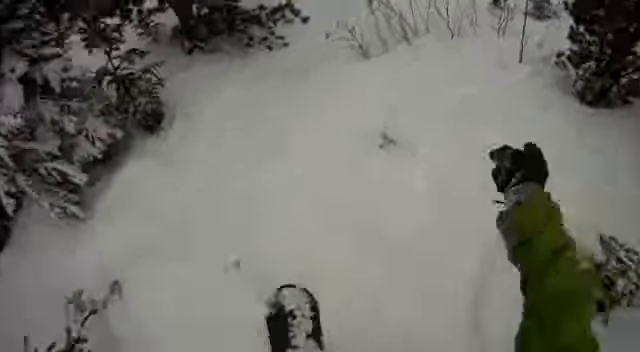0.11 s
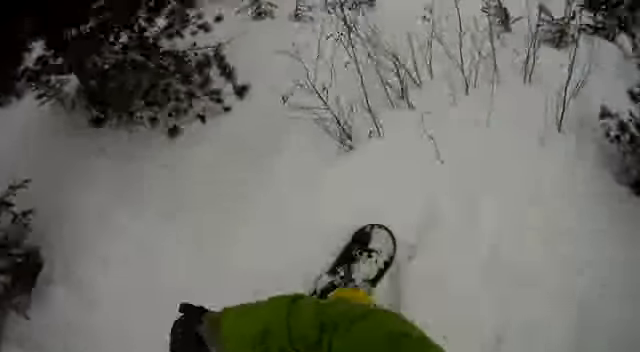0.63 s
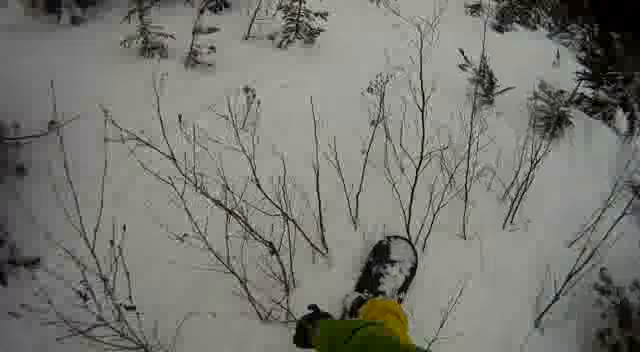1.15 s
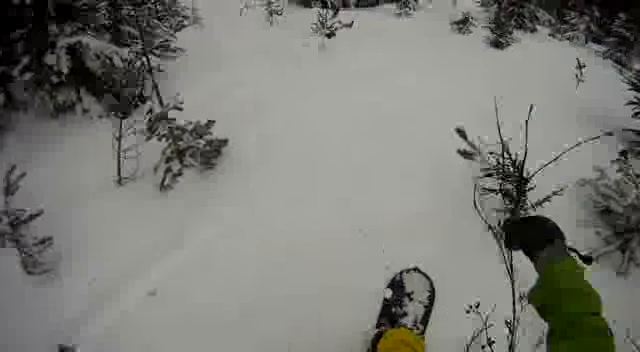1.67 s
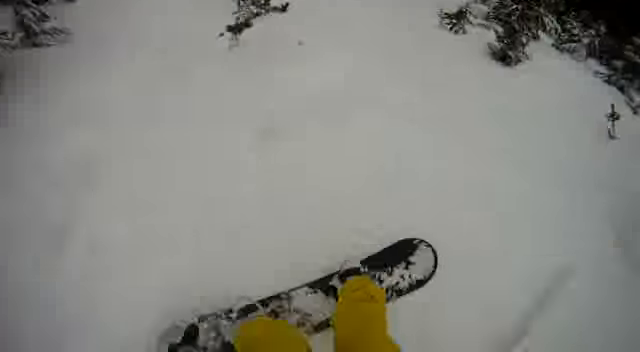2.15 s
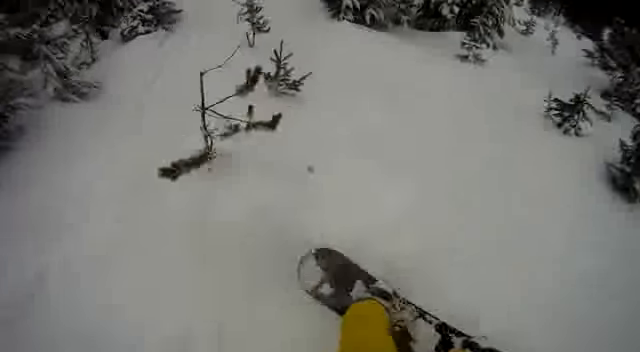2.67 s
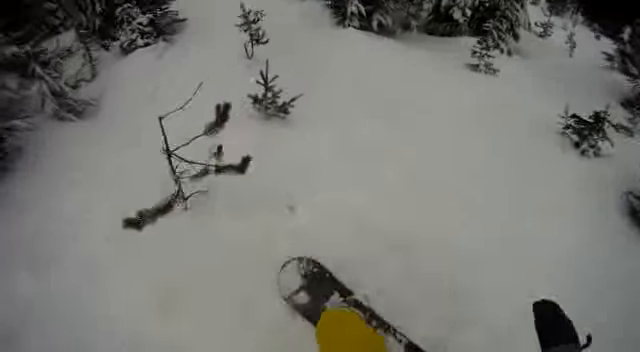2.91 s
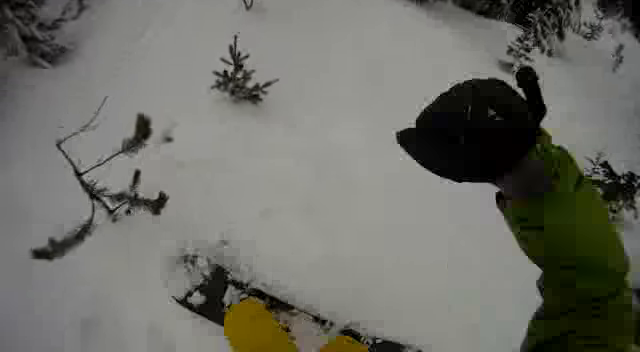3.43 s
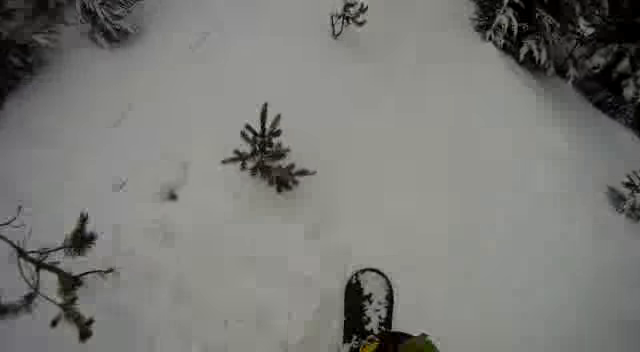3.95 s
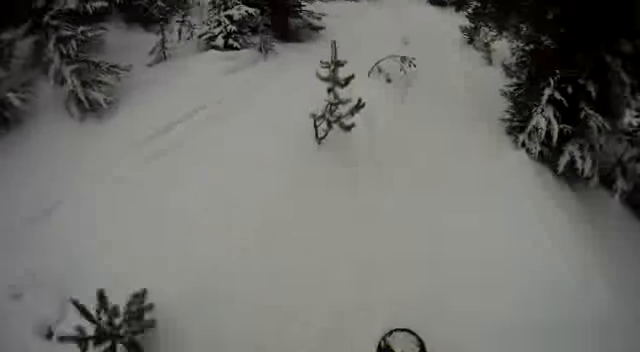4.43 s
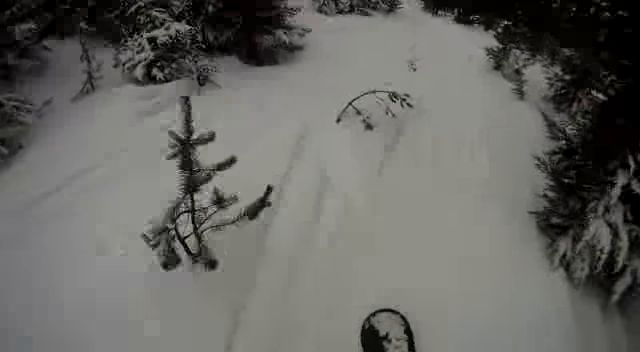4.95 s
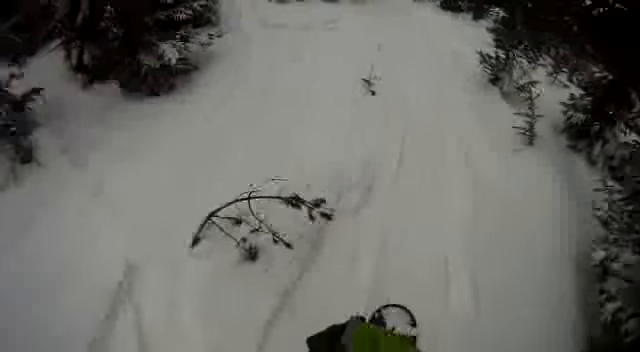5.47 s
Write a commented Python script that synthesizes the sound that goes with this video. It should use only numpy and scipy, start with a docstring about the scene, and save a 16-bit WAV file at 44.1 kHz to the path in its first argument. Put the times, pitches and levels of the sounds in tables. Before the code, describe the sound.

Close, muffled and gritty helmet-camera sound outdoors on a snowy slope. Grainy snow hiss flickers under light wind rumble while branches tick and scrape against the plastic case. Heavy low thumps strike just before and after two seconds, with a brief snow surge. After a quiet pause, a sharp knock and low thud return, followed by a lesser bump and mostly steady, soft sliding.

```python
"""A low wind rumble and a faint hiss come first, then thumps, twig ticks and rushes of snow.
A snowboard runs through deep powder and thin brush, heard by a small camera cased in plastic on a helmet.
Jolts push the sprung mount, which rings low; strikes ring the modes of the case.
Snow is dense grains in flickering noise; wind and jolts shake the mount as low noise.
The camera samples slowly and holds each sample, so the sound is mirrored into the treble."""
import sys
import numpy as np
from scipy import signal
from scipy.fft import rfft, irfft
from scipy.io import wavfile
from scipy.ndimage import uniform_filter1d

SR = 44100
rng = np.random.default_rng(int(sys.argv[2]) if len(sys.argv) > 2 else 0)


def unload_wav(signal):
    """Save mono or channel-first audio to the path in sys.argv[1] as 16-bit WAV at rate SR, clipped to [-1, 1]."""
    wavfile.write(
        sys.argv[1],
        SR,
        np.round(np.clip(np.atleast_2d(signal).T, -1, 1) * 32767).astype(np.int16),
    )


def convert_level_to_amplitude(level_db):
    """Map a level in decibels to its linear amplitude factor."""
    exponent = np.asarray(level_db, float) / 20
    return 10 ** exponent


N = 246078  # length [samples]

# Tone of the preamp hiss: (frequency [Hz], relative density [dB per Hz])
HISS_TONE = [(88, -22), (150, -2), (222, -4), (315, -6.5), (350, -7.5), (519, -13.5), (569, -10),
             (5600, -22.5), (7280, -56), (12300, -120)]
# Tone of the shaken mount: (frequency [Hz], relative density [dB per Hz])
SHAKE_TONE = [(12, -22), (20, -9.5), (43, -2), (75, -4), (93, -13), (114, -16.5), (236, -35), (400, -42),
              (520, -64), (880, -120)]
# Tone of the crushed snow: (frequency [Hz], relative density [dB per Hz])
SNOW_TONE = [(180, -55), (300, -15.5), (625, -9), (789, -17), (881, -10.5), (1490, -5), (2050, -2.5),
             (2470, -9), (2720, -9), (3310, -18), (5600, -28.5), (7280, -55), (12300, -120)]
# Tone of the noise that sets left against right: (frequency [Hz], relative density [dB per Hz])
SIDE_TONE = [(24, -26), (40, -12), (158, -18), (1270, -16.5), (1610, -22), (1820, -16.5), (5000, -23.5),
             (6500, -55), (11000, -120)]
# The slide over time: (time [s], snow hiss level [dB], wind shake level [dB])
RIDE = [(0.0, -68, -63), (0.36, -61, -52.5), (0.56, -63.5, -58.5), (0.81, -58.5, -57), (1.1, -63, -57),
        (1.38, -61.5, -54), (1.68, -58, -62), (1.79, -58.5, -45), (1.88, -48, -31), (1.99, -61, -43),
        (2.16, -53.5, -44), (2.36, -59, -42.5), (2.5, -62.5, -55), (2.8, -64.5, -58.5), (3.11, -71, -63.5),
        (3.33, -59.5, -56.5), (3.48, -56, -49.5), (3.68, -59, -54), (3.79, -55, -49), (3.9, -60.5, -56),
        (4.11, -60.5, -55.5), (4.29, -70, -53.5), (4.65, -65, -57.5), (5.17, -59, -53.5), (5.58, -61, -57)]
# Crisp spray over time: (time [s], level against the snow hiss [dB])
SPRAY = [(0, -11), (.4, -9), (1.1, -11.5), (1.45, -7), (2.1, -13.5), (2.5, -8), (3.1, -7), (3.35, -14),
         (3.95, -11.5), (4.9, -12), (5.58, -22)]
# Modes of the plastic case: (frequency [Hz], strength [dB], decay by 60 dB [s])
CASE_MODES = [(340, 10.5, 0.016), (677, -3, 0.049), (853, -8.5, 0.031), (1353, -3, 0.028),
              (1607, -6.5, 0.022), (2170, 0.5, 0.013), (2720, 5, 0.0038), (3690, 4, 0.0062),
              (4260, -23, 0.0072), (5300, 6, 0.0092)]
# Twig and branch strikes and scrapes:
# (time [s], peak level [dB], brightest pitch [Hz], reach [octaves], rattle [ms])
STRIKES = [(0.685, -48, 1930, 0.98, 2), (0.732, -57, 2000, 1.5, 3), (.79, -51.5, 1820, 0.75, 30),
           (0.823, -43.5, 2200, 1.1, 7.4), (1.036, -48, 2170, 0.45, 3.7), (1.057, -53, 2200, 0.55, 2.8),
           (1.086, -42, 2570, 0.92, 3.4), (1.247, -46, 1500, 1.7, 6.2), (1.315, -46, 930, 1.63, 4.8),
           (1.402, -47.5, 905, 1.4, 4.6), (1.487, -46.5, 1870, 0.95, 5), (1.55, -53.5, 2130, 0.52, 54),
           (1.69, -37, 2560, 0.61, 2.3), (1.825, -46, 3480, 0.92, 9.8), (1.844, -45, 3500, 1.25, 8.8),
           (1.857, -43.5, 2000, 0.78, 8.7), (1.886, -43.5, 4040, 0.56, 32), (1.9148, -19, 1326, 0.71, 1.8),
           (1.924, -40, 2920, 0.8, 2.6), (2.137, -47, 1840, 0.87, 21), (2.1884, -15, 1315, 0.75, 2.45),
           (2.193, -39.5, 2940, 0.35, 5), (2.285, -54, 2530, 0.71, 80), (2.38, -46.5, 3800, 1.3, 8.6),
           (2.414, -49.5, 1500, 1.37, 4.3), (2.452, -51.5, 2500, 0.88, 3.3), (2.684, -50.5, 2000, 2.8, 2.1),
           (3.518, -43.5, 3100, 0.93, 22), (3.544, -44, 3820, 0.86, 16), (3.559, -32.5, 985, 1.2, 7.3),
           (3.565, -40.5, 1600, 1.8, 6.2), (3.578, -52.5, 4400, 0.84, 39), (3.612, -41.5, 2420, 0.43, 21),
           (3.639, -47, 2310, 0.3, 1.8), (3.731, -46.5, 2100, 0.46, 24), (3.757, -46, 2020, 0.54, 30),
           (3.89, -45, 3060, 1.1, 7.3), (3.914, -41.5, 2780, 0.78, 10), (5.473, -46.5, 2260, 0.66, 5.1)]
# Jolts that push the case: (time [s], push [dB], length [ms])
JOLTS = [(0.143, -30.5, 13.8), (.308, -46.5, 15), (.775, -24.5, 6.6), (0.9036, -20.5, 12),
         (0.9996, -33.5, 14), (1.56, -41, 11.4), (1.606, -36, 17), (1.645, -42, 14.7), (1.791, -25, 12.5),
         (1.859, -25, 5), (1.875, -21.5, 15), (1.899, -27, 15.6), (1.9149, -15.5, 3.7), (1.9173, -3, 17.6),
         (2.009, -34, 7.3), (2.094, -28, 20.7), (2.15, -31, 14), (2.173, -25, 7.3), (2.1885, -2.5, 23.4),
         (2.1893, -9.5, 4.5), (2.414, -11, 11.4), (2.78, -37.5, 20), (2.871, -38, 15), (3.289, -31.5, 23.5),
         (3.5097, -21, 4.7), (3.538, -22.5, 18.3), (3.561, -5, 16.3), (3.721, -37.5, 7.3),
         (3.776, -34.5, 15), (3.866, -15, 22), (3.894, -27.5, 6.8), (4.188, -42, 13.6), (4.2325, -25, 16.1),
         (4.507, -45, 13.3), (4.951, -36.5, 18.4), (5.272, -31.5, 14.6)]


def level(x, db):
    """Set the rms level of x in dB."""
    return x * convert_level_to_amplitude(db) / np.sqrt(np.mean(x ** 2))


def colour(x, points):
    """Weight the spectrum by (frequency [Hz], gain [dB]) points."""
    hz, db = np.transpose(points)
    f = np.maximum(np.arange(N // 2 + 1) * SR / N, 1)
    gain = convert_level_to_amplitude(np.interp(np.log(f), np.log(hz), db))
    return irfft(rfft(x) * gain, N)


def walk(rate):
    """Random values held for 1 / rate seconds and smoothed twice; spread about 0.5."""
    k = int(SR / rate)
    steps = np.repeat(rng.standard_normal(N // k + 1), k)
    return 0.65 * uniform_filter1d(uniform_filter1d(steps, k), k)[:N]


def add(out, s, x):
    """Mix x into out from s seconds on."""
    i = int(s * SR)
    out[i:i + len(x)] += x[:N - i]


def preamp_hiss():
    """Steady coloured noise from the preamp."""
    return level(colour(rng.standard_normal(N), HISS_TONE), -65)


def mount_shake(wind_db):
    """Wind rocks the mount as low noise, and every jolt leaves a fading shudder of the helmet."""
    SHUDDER_DB, SHUDDER_S = -30.5, 0.053  # start against the push [dB], time constant [s]
    fade = np.exp(-np.arange(SR // 2) / SR / SHUDDER_S)
    shudder = np.zeros(N)
    for s, db, _ in JOLTS:
        add(shudder, s, convert_level_to_amplitude(db + SHUDDER_DB) * fade)
    rumble = level(colour(rng.standard_normal(N), SHAKE_TONE), 0)
    return rumble * np.hypot(convert_level_to_amplitude(wind_db), shudder) * convert_level_to_amplitude(2.3 * walk(7.3))


def snow_grains():
    """Sparse single-sample clicks of uneven size and random sign: crystals crushed under the base."""
    GRAINS_PER_S = 1500
    happens, sign, size = rng.random((3, N))
    size_db = np.minimum(-2.5 * np.log(1 - size), 9.5)  # a few are much larger
    return (happens < GRAINS_PER_S / SR) * np.sign(sign - 0.5) * convert_level_to_amplitude(size_db)


def snow(spray_db):
    """Grains in a hiss whose low and high halves flicker apart, with fine bright spray on top."""
    SPLIT_HZ, SPRAY_HZ = 1900, (2900, 5850)
    crush = level(snow_grains(), -0.8) + rng.standard_normal(N)
    hiss = level(colour(crush, SNOW_TONE), 0)
    low = signal.sosfiltfilt(signal.butter(2, SPLIT_HZ, fs=SR, output="sos"), hiss)
    high = hiss - low
    spray_band = signal.butter(2, SPRAY_HZ, "band", fs=SR, output="sos")
    spray = level(signal.sosfilt(spray_band, rng.standard_normal(N)), 0)
    flickering = low * convert_level_to_amplitude(4.4 * walk(37)) + high * convert_level_to_amplitude(7.6 * walk(40))
    return flickering + spray * convert_level_to_amplitude(spray_db + 4.5 * walk(48))


def faint_ticks():
    """Small twigs and crusts at random moments, as rows like those of STRIKES."""
    rows = []
    for when, softer, pitch, length in rng.random((30, 4)):
        peak_db = -54.5 - 8.0 * softer
        hz = 2100 * 2 ** (pitch - 0.5)
        rattle_ms = 4.2 * 2 ** (3.3 * length - 1)
        rows.append((when * N / SR, peak_db, hz, 1.2, rattle_ms))
    return rows


def case_ring(t, hz, reach, chance):
    """Decaying case modes, strongest near hz, each a little off in strength and pitch."""
    ring = np.zeros(len(t))
    for (f, db, t60), (louder, sharper) in zip(CASE_MODES, chance):
        away = np.log2(f / hz) / reach
        strength = convert_level_to_amplitude(db + 1.4 * louder - 8.1 * away ** 2)
        ring += strength * np.sin(2 * np.pi * f * (1 + 0.038 * sharper) * t) * 1000 ** (-t / t60)
    return ring


def strikes():
    """A rattle of contact rings the case near its brightest pitch; soft contact leaves out the top."""
    FIRST_TOUCH, DRY_CRACK = 7.4, 4.34  # against the rattle's rms, against the ring's peak
    DRAG_DB, DRAG_S = -32, 0.012  # the branch drags on after its blow
    out, t = np.zeros(N), np.arange(SR // 12) / SR
    rows = STRIKES + faint_ticks()
    rattles = rng.standard_normal((len(rows), len(t)))
    chances = rng.standard_normal((len(rows), len(CASE_MODES), 2))
    for (s, db, hz, reach, ms), rattle, chance in zip(rows, rattles, chances):
        blow = np.exp(-(t / (ms / 1000)) ** 2)
        drag = convert_level_to_amplitude(DRAG_DB) * np.exp(-t / DRAG_S)
        contact = rattle * (blow + drag)
        contact[0] = -FIRST_TOUCH  # the first touch is the hardest
        ring = case_ring(t, hz, reach, chance)
        ring[0] = DRY_CRACK * np.max(ring)  # part of the contact reaches the microphone unrung
        band = [hz * 2 ** (-1.6 * reach), min(hz * 2 ** (1.03 * reach), SR / 4)]
        softness = signal.butter(4, band, "band", fs=SR, output="sos")
        hit = signal.sosfilt(softness, signal.fftconvolve(contact, ring))
        peak = np.sqrt(np.max(uniform_filter1d(hit ** 2, SR // 500)))  # loudest 2 ms
        add(out, s, convert_level_to_amplitude(db) * hit / peak)
    return out


def push_shape(db, ms):
    """1 swells and eases evenly, lower starts suddenly; hard or brief pushes are more sudden."""
    HARD, GENTLE = 0.51, 0.9
    by_force = np.interp(db, [-20.5, 0], [GENTLE, HARD])
    by_length = np.interp(ms, [3.7, 13.2], [HARD, GENTLE])
    return min(by_force, by_length)


def jolts():
    """Each push swells and eases off; the sprung mount lets it through, rebounds and rings."""
    PADDING_HZ, MOUNT_HZ, MOUNT_T60_S, SAG_HZ = 437, 78.1, 0.13, 5.4
    push = np.zeros(N)
    for s, db, ms in JOLTS:
        u = np.linspace(0, 1, int(ms * SR / 1000))
        add(push, s, -convert_level_to_amplitude(db) * np.sin(np.pi * u ** push_shape(db, ms)) ** 2)
    # helmet padding rounds the edges
    push = signal.sosfilt(signal.butter(2, PADDING_HZ, fs=SR, output="sos"), push)
    w, fade = 2 * np.pi * MOUNT_HZ, np.log(1000) / MOUNT_T60_S
    spring = signal.bilinear([1, 0, 0], [1, 2 * fade, w ** 2], SR)
    rung = signal.lfilter(*spring, push)
    return signal.sosfilt(signal.butter(1, SAG_HZ, "high", fs=SR, output="sos"), rung)


def scene():
    """Mix the thumps, strikes, slide, shake and hiss alike into both channels."""
    t = np.arange(N) / SR
    s, *columns = np.transpose(RIDE)
    snow_db, wind_db = (np.interp(t, s, c) for c in columns)
    spray_db = np.interp(t, *np.transpose(SPRAY))
    slide = snow(spray_db) * convert_level_to_amplitude(snow_db)
    mix = jolts() + strikes() + slide + mount_shake(wind_db) + preamp_hiss()
    return np.tile(mix, (2, 1))


def sample_and_hold(x):
    """Sample at 12 kHz and hold each sample for four steps of 48 kHz, mirroring sound into the treble."""
    kept = signal.sosfilt(signal.ellip(8, 0.2, 60, 5550, fs=SR, output="sos"), x)
    held = np.repeat(signal.resample_poly(kept, 160, 147)[::4], 4)
    return signal.resample_poly(held, 147, 160)[:N]


def channel_difference(mid):
    """Faint noise that grows with the level, plus a flickering trace of the sound itself."""
    loudness = np.sqrt(uniform_filter1d(mid ** 2, SR // 30) + convert_level_to_amplitude(-100))
    noise = level(colour(rng.standard_normal(N), SIDE_TONE), -77.5)  # before it follows the loudness
    return noise * loudness ** 0.15 + convert_level_to_amplitude(-37.0) * walk(150) * mid


def roll_off(x):
    """The treble ends steeply here."""
    return signal.sosfilt(signal.butter(12, 15620, fs=SR, output="sos"), x)


def record(dry):
    """One slowly sampling microphone feeds two channels that differ by a faint noise."""
    mid = sample_and_hold(dry[0])
    side = channel_difference(mid)
    stereo = mid + side * np.array([[1], [-1]])
    both = signal.sosfilt(signal.ellip(10, 0.2, 90, 15200, fs=SR, output="sos"), stereo)
    return roll_off(both)


dry = scene()
out = record(dry)
unload_wav(out)
```